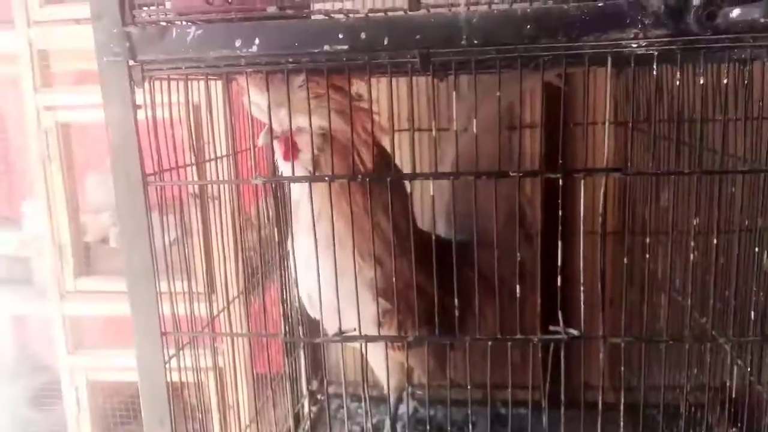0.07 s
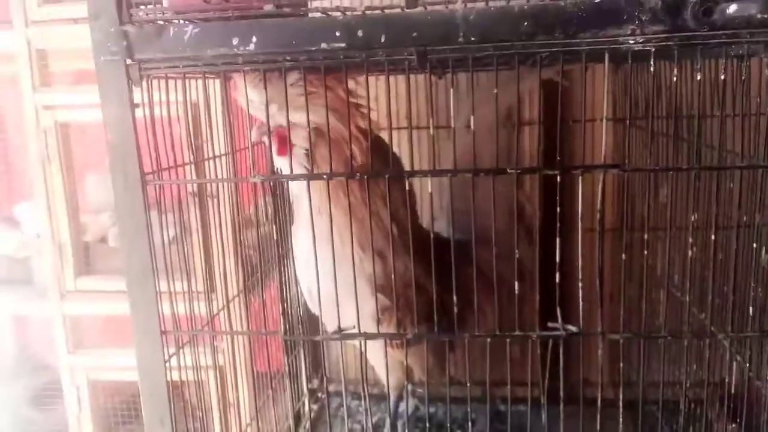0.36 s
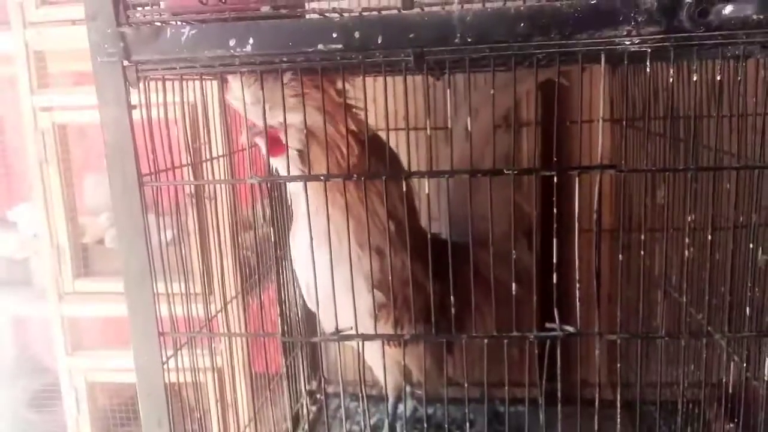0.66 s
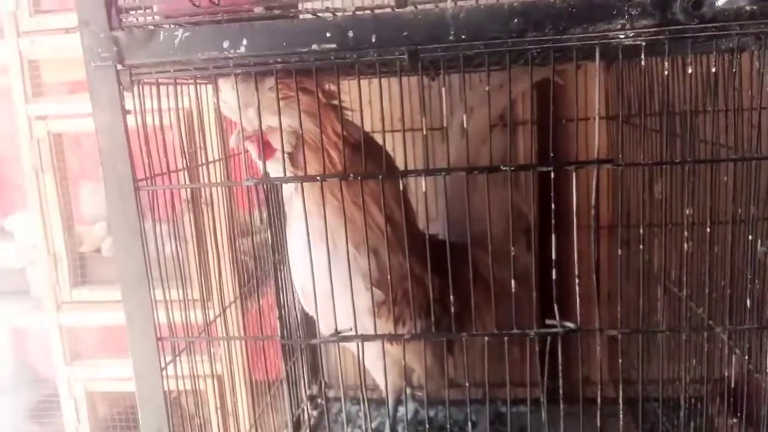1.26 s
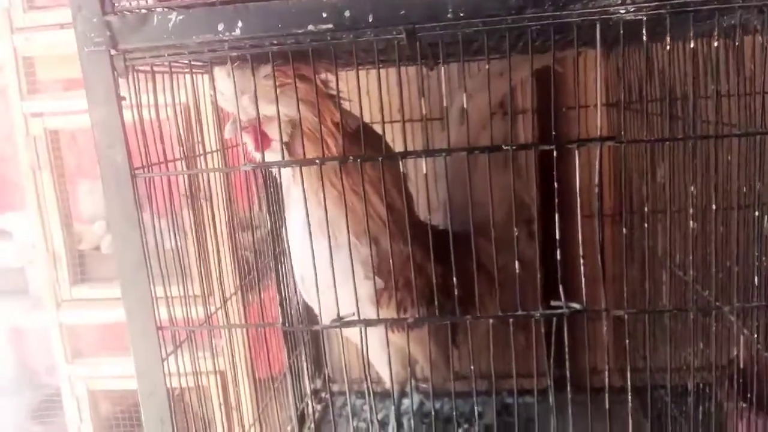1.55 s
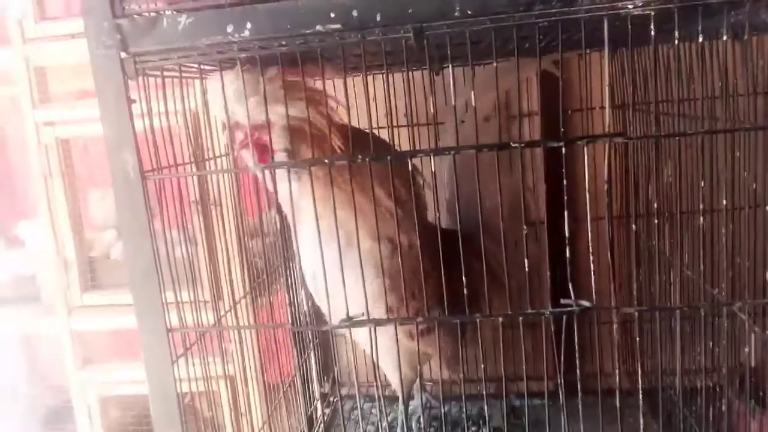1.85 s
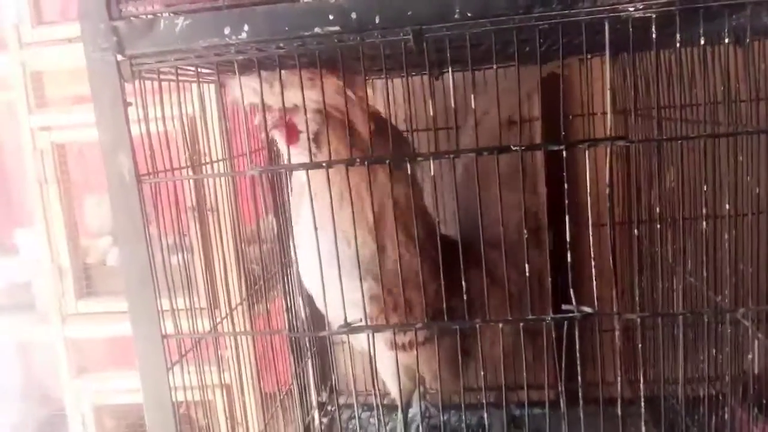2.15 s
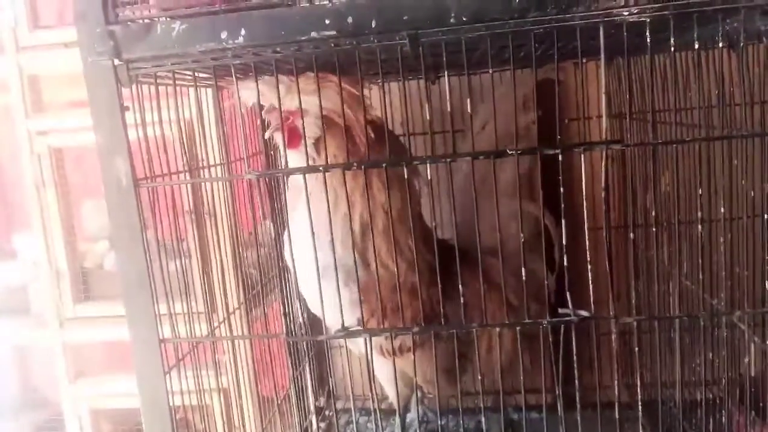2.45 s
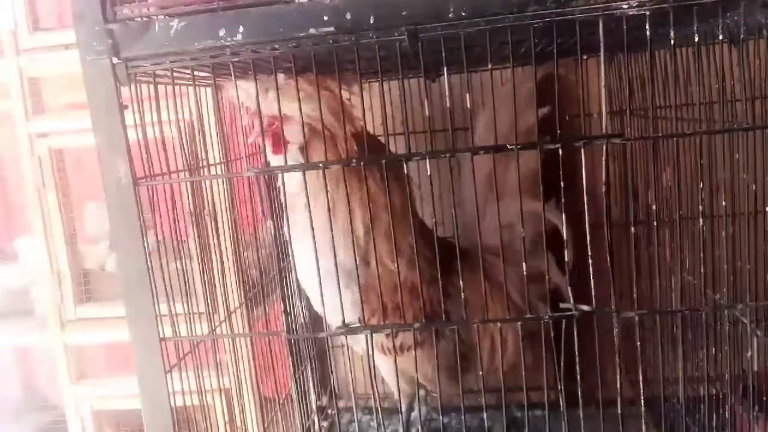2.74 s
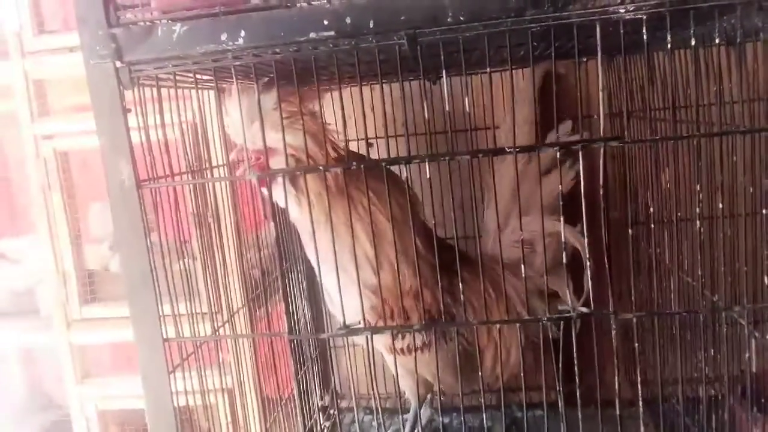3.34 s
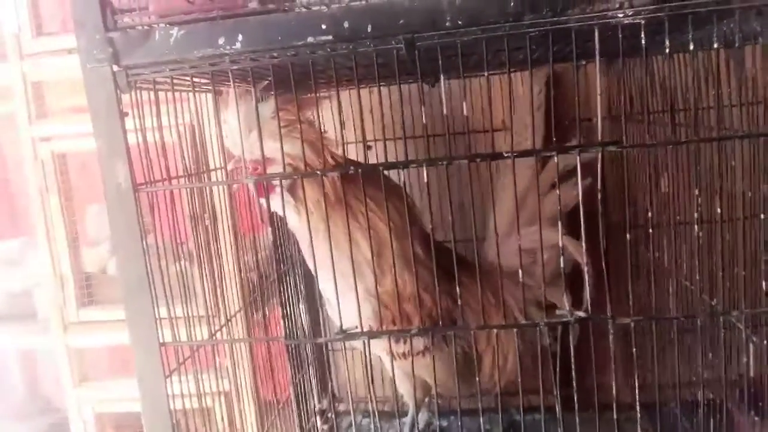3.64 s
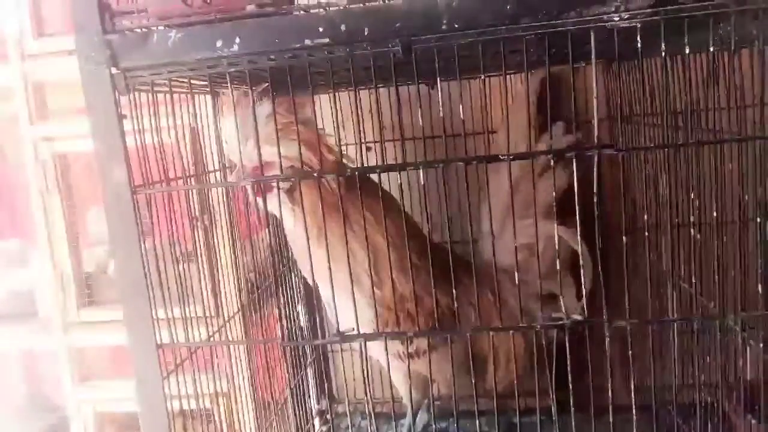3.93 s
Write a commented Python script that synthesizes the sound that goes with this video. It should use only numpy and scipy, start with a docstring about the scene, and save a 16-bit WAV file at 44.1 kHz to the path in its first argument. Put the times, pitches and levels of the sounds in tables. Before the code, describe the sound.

Small birds twitter and feathers rustle softly, then a nearby rooster in a cage lets out one hoarse crow with a long falling finish. Far traffic and a low motor hum lie underneath, with slight echo from close walls.

```python
"""A caged rooster crows

The crow is three short notes and a long falling one. The syrinx, a nonlinear oscillator, flips between
a clean tone, a doubled period and a chaotic rasp, filtered by throat and beak, and ends in a low groan.
A squeak of indrawn air leads into it. Around it small birds whistle, feathers rustle and a hen calls
faintly; nearby walls reflect these sounds, and far off traffic murmurs and a motor hums."""
import sys
import numpy as np
from scipy import signal
from scipy.fft import rfft, irfft
from scipy.io import wavfile
from scipy.ndimage import uniform_filter1d, map_coordinates

SR = 44100
rng = np.random.default_rng(int(sys.argv[2]) if len(sys.argv) > 2 else 0)


def transcribe(u):
    """Save the signal u as a 16-bit wav file named by the first command-line argument.

    u: samples, shape (n,) or (channels, n), limited to [-1, 1]; the rate is SR.
    q: integer samples, one column per channel.
    """
    v = np.clip(np.atleast_2d(u).T, -1, 1)
    q = np.round(v * 32767).astype(np.int16)
    wavfile.write(sys.argv[1], SR, q)


N = 176400
T = np.arange(N) / SR


def from_db(db):
    """Amplitude grows tenfold with every 20 dB."""
    return 10 ** (np.asarray(db) / 20)


def rms_one(x):
    """Division by the root mean square gives unit power."""
    return x / np.sqrt(np.mean(x ** 2) + 1e-20)


def curve(rows, column=1):
    """Linear interpolation of a table's column in time."""
    rows = np.array(rows)
    return np.interp(T, rows[:, 0], rows[:, column])


def envelope(rows, column=1):
    """Amplitude envelope of a level curve, silent outside its span."""
    return from_db(curve(rows, column)) * (T >= rows[0][0]) * (T <= rows[-1][0])


def swell(start, length):
    """Progress from 0 to 1 through a short sound, and its semicircular envelope."""
    progress = np.clip((T - start) / length, 0, 1)
    return progress, np.sqrt(4 * progress * (1 - progress))


def at_hz(spectrum, hz):
    """Level of a spectrum, interpolated on a logarithmic frequency axis."""
    freqs, db = np.transpose(spectrum)
    return np.interp(np.log(hz), np.log(freqs), db)


def phase_of(hz):
    """Phase in radians is the time integral of frequency."""
    return 2 * np.pi * np.cumsum(hz) / SR


def drift(rate_hz):
    """Low-passed noise: a random fluctuation of unit power."""
    pole = np.exp(-40 * np.pi * rate_hz / SR)
    noise = rng.standard_normal(N // 20 + 2002)
    slow = signal.lfilter([1], [1, -2 * pole, pole * pole], noise)[2000:]
    return np.interp(np.arange(N) / 20, np.arange(len(slow)), rms_one(slow))


def band(x, low, high):
    """Band-pass filtering, scaled to unit power."""
    sections = signal.butter(4, [low, high], "band", fs=SR, output="sos")
    return rms_one(signal.sosfilt(sections, x))


def resonate(x, hz, width_hz):
    """Two equal resonators in cascade give a peak with steep skirts; unit power."""
    r = np.exp(-np.pi * width_hz / SR)
    section = [1 - r, 0, r - 1, 1, -2 * r * np.cos(2 * np.pi * hz / SR), r * r]
    return rms_one(signal.sosfilt([section, section], x))


def reflections(x, t60_s=0.18):
    """Reverberation: echoes between nearby walls lose a fixed fraction on each round trip."""
    out = np.zeros(N)
    for k, lag in enumerate((rng.uniform(.006, .04, 12) * SR).astype(int)):
        loop, gain = x.copy(), from_db(-60 * lag / SR / t60_s)
        for i in range(lag, N, lag):
            loop[i:i + lag] += gain * loop[i - lag:i][:N - i]
        out += (loop - x) * (-1) ** k
    return out / np.sqrt(12)


def yard():
    """Far traffic and twitter add incoherently into noise whose bands fluctuate in level."""
    # Noise spectrum. Each row: frequency in Hz, relative spectral density in dB.
    spectrum = [(15, -64), (25, -34), (38, -28), (47, -29), (59, -24), (111, -4.5), (149, -1), (463, -13.5),
                (545, -14), (911, -17.5), (1040, -12), (1160, -17), (2280, -12), (3160, -8), (3820, -11),
                (4490, -18.5), (5880, -21.5), (8830, -43), (11900, -50.5), (14800, -41), (16000, -29)]
    # Swells above 2 kHz, below 80 Hz and at about 200-500 Hz. Each row: time in seconds, gain in dB.
    twitter = [(0, 0.5), (.22, -0.5), (.43, 0), (.58, 4.5), (.67, -4.5), (.75, 1), (1.0, 1), (1.2, 5),
               (1.28, -4), (1.47, 2), (1.66, 0.5), (1.9, 3.5), (2.3, 0), (3.0, -1), (3.55, -2.5), (4, 0.5)]
    rumble = [(0, 13), (1.0, -2), (1.9, 11), (2.05, -16), (3.0, -3), (3.6, 5), (4, 1)]
    low_middle = [(0, 0.5), (.22, 4.5), (.6, -0.5), (1.2, 2), (1.9, 2), (2.2, -2), (3.4, -1.5), (3.7, 3.5),
                  (4, 6.5)]
    edges = np.geomspace(25, 17000, 29)
    freqs = np.arange(N // 2 + 1) * SR / N
    coloured = rfft(rng.standard_normal(N)) * from_db(at_hz(spectrum, freqs + 1))
    coloured /= np.std(irfft(coloured, N))
    out, flicker_db = np.zeros(N), 2.56
    for low, high in zip(edges, edges[1:]):
        db = flicker_db * drift(25)
        db += (low > 2000) * (curve(twitter) + flicker_db * drift(17))
        db += (low < 80) * curve(rumble) + (180 < low < 450) * curve(low_middle)
        out += irfft(coloured * (freqs >= low) * (freqs < high), N) * from_db(db)
    return from_db(-34) * out


def motor():
    """A distant motor radiates a line spectrum; each line wavers in level and frequency."""
    # Lasting hum. Each row: frequency in Hz, level in dB.
    hum = [(72, -49.5), (104, -48), (143, -42.5)]
    # A drone that comes and goes. Each row: time in seconds, level in dB.
    drone = [(0, -51), (1.0, -42), (1.9, -46), (2.12, -34.5), (2.3, -46), (2.649, -74), (3.2, -48),
             (3.6, -37), (4, -30)]
    drone_hz = 160.3
    lines = [(hz, from_db(db)) for hz, db in hum] + [(drone_hz, envelope(drone))]
    return sum(gain * from_db(4.1 * drift(3.7)) * np.sin(phase_of(hz * (1 + 0.013 * drift(17.3))))
               for hz, gain in lines)


def small_birds(arch=0.16, warble_depth=0.045):
    """Frequency modulation: each warbling whistle rises and falls, blurred by the walls."""
    # Each row: start in seconds, length in seconds, top pitch in Hz, level in dB.
    chirps = [(0.0, 0.037, 3720, -31), (0.166, 0.065, 3910, -29.5), (0.263, 0.025, 3220, -27),
              (0.293, 0.027, 3350, -21.5), (0.339, 0.042, 2650, -33), (0.49, 0.032, 3574, -25.5),
              (.515, 0.029, 3880, -22), (0.643, 0.027, 3900, -32), (0.802, 0.013, 3170, -20.5),
              (0.826, 0.026, 3470, -28), (0.863, 0.038, 3850, -26.5), (.917, 0.024, 3550, -21.5),
              (0.936, 0.032, 3320, -27), (1.146, 0.073, 3770, -27.5), (1.319, 0.063, 4120, -32),
              (1.382, 0.02, 3460, -25), (1.42, 0.031, 3790, -28), (1.438, 0.04, 3310, -26),
              (1.508, 0.014, 4550, -26.5), (1.517, 0.0225, 3090, -20), (1.553, 0.0416, 3980, -22.5),
              (1.702, 0.0453, 3564, -23.5), (1.758, 0.031, 3380, -27.5), (1.80, 0.047, 3750, -31),
              (1.904, 0.024, 4900, -23), (1.93, 0.019, 4620, -27), (1.9, 0.033, 6680, -27.5),
              (1.93, 0.037, 6180, -21.5), (2.125, 0.026, 4360, -32), (3.18, .18, 5110, -35.5),
              (3.524, 0.029, 3620, -25), (3.594, 0.0685, 3266, -27.5), (3.79, 0.025, 5200, -29.5),
              (3.832, 0.0091, 3877, -24.5), (3.875, .028, 4973, -38), (3.967, 0.036, 4133, -27)]
    out, warble = np.zeros(N), 1 + warble_depth * drift(284)
    for start, length, hz, db in chirps:
        progress, gain = swell(start, length)
        phase = phase_of(hz * warble * (1 - arch * (2 * progress - 1) ** 2))
        out += from_db(db) * gain * (np.sin(phase) + from_db(-29.5) * np.sin(2 * phase))
    return out + from_db(-3) * reflections(reflections(out) + out)


def hen():
    """Each faint call is a pure tone gliding in frequency."""
    # Each row: start and length in seconds, first and last pitch in Hz, level in dB.
    calls = [(1.486, 0.032, 932, 920, -32.5), (1.66, 0.084, 1094, 1206, -28.5),
             (1.726, 0.036, 976, 960, -33), (3.079, 0.055, 1144, 1178, -26)]
    out = np.zeros(N)
    for start, length, first_hz, last_hz, db in calls:
        progress, gain = swell(start, length)
        pitch = first_hz + (last_hz - first_hz) * progress ** 2
        out += from_db(db) * gain * np.sin(phase_of(pitch))
    return out


def feathers(grain_db=2.5, half_width_octaves=0.29):
    """Friction between feathers gives grainy noise, with a high hiss as the bird gathers itself."""
    # Each row: start in seconds, length in seconds, centre frequency in Hz, level in dB.
    rustles = [(0.0, 0.038, 5640, -42), (0.484, 0.072, 4700, -33.5), (0.684, 0.11, 5350, -29.5),
               (1.038, 0.076, 5100, -30.5), (1.50, 0.055, 5100, -40), (1.821, 0.054, 5020, -29),
               (1.859, .10, 5930, -37), (2.301, .06, 4800, -34), (2.781, 0.11, 5910, -35.5),
               (3.423, 0.04, 5300, -36), (3.625, .04, 5093, -33.5)]
    # Each row: time in seconds, level in dB.
    hiss = [(1.87, -84), (1.895, -47), (1.945, -37), (1.975, -48), (2.02, -75)]
    grains = rng.standard_normal(N) * from_db(grain_db * drift(300))
    air, out = band(grains, 12100, 18000), np.zeros(N)
    for start, length, hz, db in rustles:
        swish = band(grains, hz / 2 ** half_width_octaves, hz * 2 ** half_width_octaves)
        out += from_db(db) * swell(start, length)[1] ** 2 * (swish + from_db(-19.5) * air)
    return out + envelope(hiss) * air


def squeak(wobble=0.02):
    """Flow-driven oscillation: air drawn through the tight syrinx whistles hoarsely."""
    # Each row: time in seconds, pitch in Hz, level in dB.
    contour = [(1.875, 2320, -60), (1.893, 2350, -29.5), (1.915, 2290, -30), (1.945, 2236, -37),
               (1.965, 2190, -34), (1.985, 2330, -57)]
    # Each row: harmonic number, relative level in dB.
    harmonics = [(1, -3), (2, 3), (3, -3), (4, -16), (5, -13), (6, -32)]
    phase = phase_of(curve(contour) * (1 + wobble * drift(198)))
    whistle = sum(from_db(db + 3.8 * drift(80)) * np.sin(k * phase) for k, db in harmonics)
    return envelope(contour, column=2) * whistle


def groan(wobble=0.0095):
    """Nearly periodic vibration at a lower pitch closes the crow with a harmonic series."""
    # Each row: time in seconds, pitch in Hz, level in dB.
    contour = [(3.70, 706, -48), (3.73, 681, -35), (3.76, 674, -33), (3.78, 672.5, -20), (3.80, 661, -29),
               (3.835, 661, -24.5), (3.86, 673, -16), (3.89, 688, -24.5), (3.908, 703.5, -16),
               (3.922, 649, -22.5), (3.933, 665, -34), (3.952, 685, -28.5), (3.98, 660, -48),
               (4.0, 660, -60)]
    # Each row: harmonic number, relative level in dB.
    harmonics = [(1, 1), (2, -16), (3, -16), (4, -34), (5, -36)]
    phase = phase_of(curve(contour) * (1 + wobble * drift(120)))
    voice = sum(from_db(db) * np.sin(k * phase) for k, db in harmonics)
    return envelope(contour, column=2) * np.sqrt(2) * voice


def locked_tones():
    """Mode locking: brief pure tones stand for moments when the rasp settles on one resonance."""
    # Each row: start in seconds, length in seconds, frequency in Hz, level in dB.
    locks = [(1.981, 0.024, 694, -21), (2.2, 0.012, 770, -19.5), (2.595, 0.029, 791, -29),
             (2.713, .016, 1467, -23), (3.22, 0.011, 1623, -16), (3.283, 0.016, 1622, -13),
             (3.391, 0.014, 1516, -11), (3.467, 0.0096, 1565, -20.5), (3.886, .012, 1590, -20)]
    return sum(from_db(db) * swell(start, length)[1] * np.sin(2 * np.pi * hz * T)
               for start, length, hz, db in locks)


def rasp(pitch, formants, jitter=0.16, shimmer=0.31, burst_db=1):
    """Source and filter: uneven pulses and puffs of air from the chaotic syrinx ring the throat."""
    cycles = np.cumsum(pitch * np.exp(jitter * drift(400))) / SR
    pulses = np.diff(np.floor(cycles), prepend=0) * (1 + shimmer * rng.standard_normal(N))
    puffs = rng.standard_normal(N) * (1 + np.cos(2 * np.pi * cycles))
    source = rms_one(pulses) + rms_one(puffs)
    voice = sum(from_db(db) * resonate(source, hz, width) for hz, width, db in formants)
    voice /= from_db(burst_db * drift(110))
    # Soften the fastest bursts, then hold the power near one over 25 ms.
    voice /= (uniform_filter1d(voice ** 2, size=130) + 1e-9) ** 0.1
    return voice / np.sqrt(uniform_filter1d(voice ** 2, size=1100) + 1e-9)


def rattle(hz, depth_db, drift_hz):
    """Amplitude modulation at a wandering rate is heard as an uneven rattle."""
    rate = hz * np.exp(0.35 * drift(drift_hz))
    return from_db(depth_db * np.sin(phase_of(rate)))


def rasping_notes(pitch, opening_gain, long_gain, close_gain):
    """Formants, the throat's resonances, colour the opening notes, long note and close differently."""
    # Each row: centre frequency in Hz, width in Hz, relative level in dB.
    opening_formants = [(816, 71, 1), (943, 60, 0.5), (1499, 78, 5), (1752, 87, 3), (1960, 115, 2.5),
                        (2332, 100, -6), (2757, 165, -2), (3826, 190, -1.5), (4550, 560, -9),
                        (6100, 940, -38), (7800, 360, -36), (9100, 210, -31), (14700, 4000, -30.5)]
    long_formants = [(711, 75, -5.5), (940, 160, -3), (1544, 148, 9), (1630, 120, 2.5), (1944, 200, -6),
                     (2400, 290, -6.5), (3290, 335, -6), (5337, 1100, -26), (6650, 1130, -10),
                     (7020, 1400, -21), (8250, 300, -39), (10400, 1500, -26), (14600, 1800, -20.5)]
    close_formants = [(792.6, 200, -7), (1407, 76, -2.5), (1585, 230, -1), (2280, 290, -3),
                      (3240, 790, -6.5), (5100, 1200, -31), (6850, 770, -14), (14600, 2500, -31)]
    # Resampling scoops the opening formants up and down. Each row: time in seconds, frequency ratio.
    scoop = [(1.96, 0.87), (1.99, 0.85), (2.02, 0.94), (2.08, .93), (2.19, 0.84), (2.205, 0.93),
             (2.235, 1.17), (2.27, 1.03), (2.29, 0.93), (2.345, 0.95), (2.37, .95), (2.41, 1.05),
             (2.46, .98), (2.52, 1.03), (2.57, 1.01), (2.605, 0.95), (2.695, 0.91), (2.725, 0.94),
             (2.76, 1.01), (2.85, 0.93)]
    read_at = np.cumsum(curve(scoop))
    scooped = map_coordinates(rasp(pitch, opening_formants), [read_at], order=3, mode="mirror")
    long_rattle = rattle(hz=69.5, depth_db=1.5, drift_hz=58.2)
    opening_rattle = rattle(hz=49.64, depth_db=2.5, drift_hz=50)
    return (opening_gain * opening_rattle * scooped
            + long_gain * long_rattle * rasp(pitch, long_formants)
            + close_gain * rasp(pitch, close_formants))


def partials(pitch, multiples, ring_hz=3470, ring_octaves=0.25, flicker_db=5):
    """Resonance shapes each partial as it slides through the response of throat and beak."""
    # Response of throat and beak. Each row: frequency in Hz, gain in dB.
    throat = [(450, -40), (700, -16), (860, -13.5), (910, -8.5), (960, -6.5), (1150, -2), (1380, 2),
              (1460, 13), (1730, 4.5), (1810, -0.5), (1900, -5.5), (1990, 1), (2300, -8), (2680, -28.5),
              (2860, -20.5), (3350, -19), (3650, -18), (3900, -27), (4300, -51), (4750, -32.5),
              (5500, -35.5), (6400, -34), (7250, -27), (7700, -38), (8300, -38.5), (9500, -46),
              (12500, -66), (15000, -39.5)]
    # The wide-open beak lifts the fourth harmonic. Each row: time in seconds, peak gain in dB.
    beak_ring = [(2.0, -13), (2.19, -4), (2.235, 22), (2.275, 18), (2.33, 2), (2.40, -4), (2.50, 6),
                 (2.60, 1), (2.68, 2), (2.725, 9), (2.745, 24.5), (2.77, 3), (2.85, -13), (3.45, -11),
                 (3.53, -3), (3.60, 0), (3.72, 3)]
    phase, ring_db, out = phase_of(pitch), curve(beak_ring), np.zeros(N)
    for k in multiples:
        nearness = np.exp(-(np.log2(k * pitch / ring_hz) / ring_octaves) ** 2)
        db = at_hz(throat, k * pitch) + ring_db * nearness + (k > 2) * flicker_db * drift(27)
        out += from_db(db) * np.sin(k * phase + rng.uniform(0, 2 * np.pi))
    return np.sqrt(2) * out


def rooster(clean_wobble=0.0007, rough_wobble=0.0225):
    """Regimes of a nonlinear oscillator: the syrinx gives a clean tone, a doubled period or chaos."""
    # Each row: time in seconds, pitch in Hz.
    melody = [(1.97, 850.4), (2.01, 844), (2.05, 865), (2.09, 865), (2.19, 860), (2.215, 917), (2.237, 991),
              (2.275, 957), (2.33, 907), (2.36, 888), (2.40, 984), (2.47, 976.7), (2.52, 1006),
              (2.57, 983.7), (2.61, 937), (2.66, 925), (2.695, 948), (2.715, 864.4), (2.745, 907.6),
              (2.765, 965.4), (2.84, 943.4), (2.91, 953), (2.96, 969), (3.0, 995), (3.15, 975),
              (3.25, 953.5), (3.45, 952), (3.52, 924), (3.59, 909.2), (3.65, 899.5), (3.72, 877)]
    # Strength of each regime. Each row: time in seconds, level in dB.
    tone_levels = [(1.98, -54), (2.005, -23), (2.05, -19.5), (2.078, -19), (2.092, -43), (2.195, -56.5),
                   (2.215, -20), (2.24, -22), (2.275, -17.5), (2.295, -41), (2.37, -38), (2.405, -22),
                   (2.47, -26), (2.56, -22.5), (2.60, -25.5), (2.65, -26.5), (2.69, -55), (2.73, -28.5),
                   (2.755, -18.5), (2.84, -22.5), (2.90, -17.5), (2.96, -24.5), (3.02, -28), (3.21, -29.5),
                   (3.25, -19.5), (3.29, -31.5), (3.49, -28), (3.525, -19), (3.66, -21.5), (3.712, -20),
                   (3.73, -29), (3.79, -62)]
    doubling_levels = [(2.17, -76), (2.192, -23.5), (2.215, -36), (2.23, -61), (2.272, -56), (2.288, -37),
                       (2.335, -24.5), (2.36, -48), (2.59, -54), (2.625, -28), (2.69, -26.5), (2.745, -53),
                       (2.82, -35), (2.895, -37.5), (2.925, -29.5), (2.96, -30.5), (2.985, -41)]
    opening_rasp = [(1.96, -52), (1.985, -21.5), (2.025, -21), (2.05, -35), (2.08, -28), (2.10, -70),
                    (2.185, -61), (2.205, -16), (2.24, -35), (2.29, -19.5), (2.33, -29.5), (2.36, -18),
                    (2.45, -20.5), (2.53, -21.5), (2.60, -17.5), (2.63, -31.5), (2.68, -39.5),
                    (2.70, -19.5), (2.73, -16.5), (2.765, -32.5), (2.81, -27.5), (2.9, -50)]
    long_rasp = [(2.74, -42), (2.80, -44.5), (2.95, -40), (2.975, -20), (3.05, -20), (3.225, -20.5),
                 (3.245, -30.5), (3.28, -20.5), (3.37, -21), (3.40, -22.5), (3.44, -21.5), (3.50, -20),
                 (3.525, -38), (3.70, -45.5), (3.73, -56)]
    close_rasp = [(3.69, -51), (3.717, -23), (3.76, -21.5), (3.84, -24), (3.86, -34), (3.888, -24.5),
                  (3.91, -38), (3.932, -28), (3.95, -44), (4.0, -38)]
    pitch, tone, doubling = curve(melody), envelope(tone_levels), envelope(doubling_levels)
    opening, held, close = envelope(opening_rasp), envelope(long_rasp), envelope(close_rasp)
    # The tone wobbles and flickers more where the rasp takes over.
    rasp_power = (opening + held + close) ** 2
    rasp_share = rasp_power / (rasp_power + tone ** 2 + doubling ** 2 + 1e-9)
    shaky_pitch = pitch * (1 + (clean_wobble + rough_wobble * rasp_share) * drift(136))
    orders = np.arange(1, 17)
    clean = tone * partials(shaky_pitch, orders) * from_db(2.5 * rasp_share * drift(90))
    # Period doubling adds lines halfway between the harmonics.
    half_orders = doubling * partials(shaky_pitch, orders[:10] + .5) * from_db(1.5 * drift(43))
    return clean + half_orders + groan() + rasping_notes(pitch, opening, held, close) + locked_tones()


def scene():
    """Superposition of direct and reflected sound at one microphone, the same in both channels."""
    near = rooster() + squeak() + feathers() + hen()
    mono = near + from_db(-7) * reflections(near) + small_birds() + yard() + motor()
    return np.array([mono, mono])


def record(dry):
    """Soft saturation rounds the peaks, and a low-pass filter removes the highest treble."""
    ceiling, stopband_hz = 0.45, 16600
    rounded = dry / (1 + (dry / ceiling) ** 8) ** (1 / 8)
    return signal.sosfilt(signal.cheby2(14, 70, stopband_hz, fs=SR, output="sos"), rounded)


dry = scene()
out = record(dry)
transcribe(out)
```